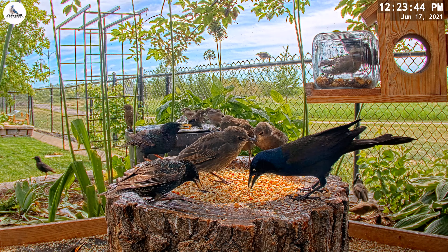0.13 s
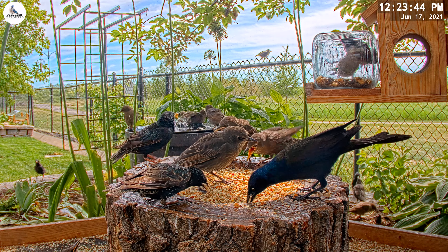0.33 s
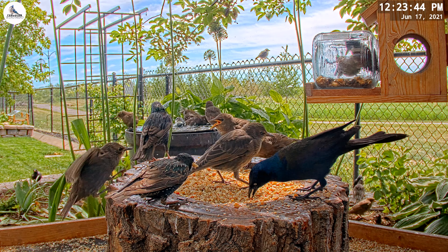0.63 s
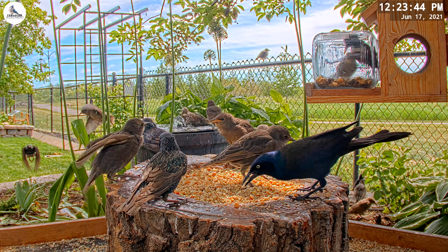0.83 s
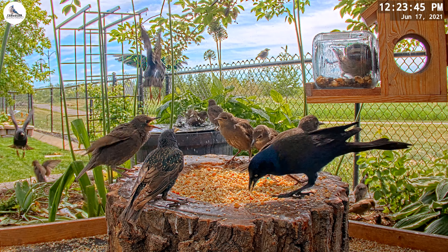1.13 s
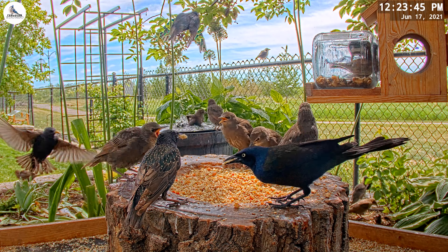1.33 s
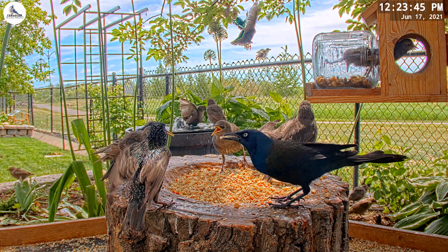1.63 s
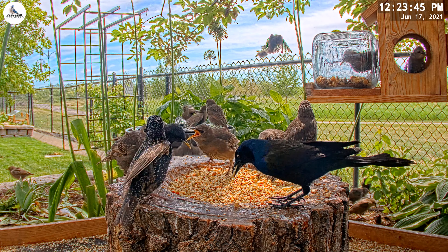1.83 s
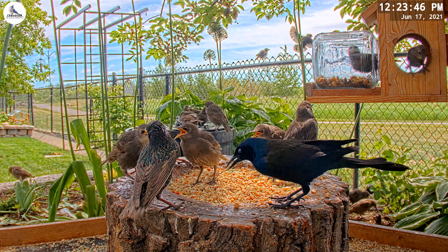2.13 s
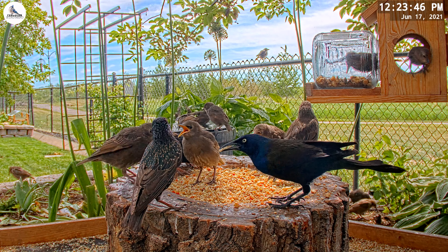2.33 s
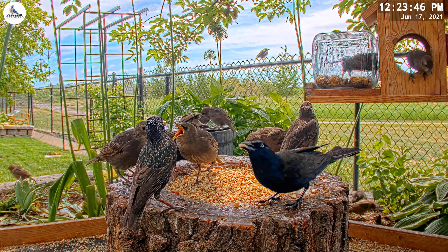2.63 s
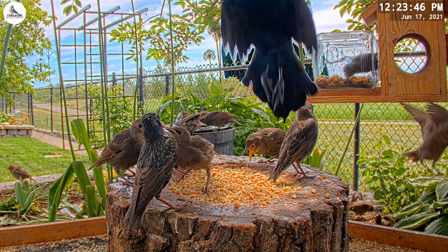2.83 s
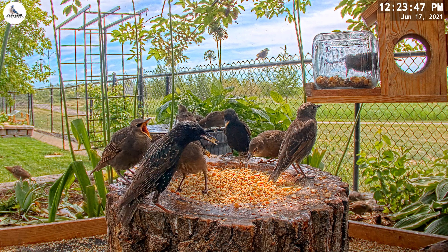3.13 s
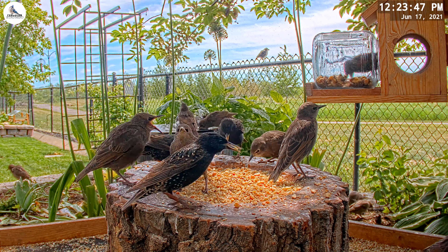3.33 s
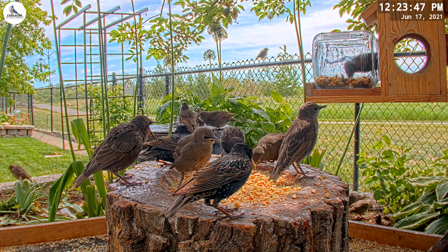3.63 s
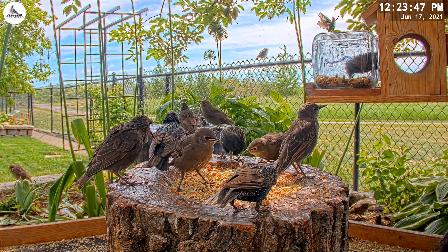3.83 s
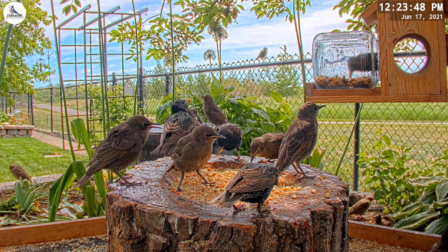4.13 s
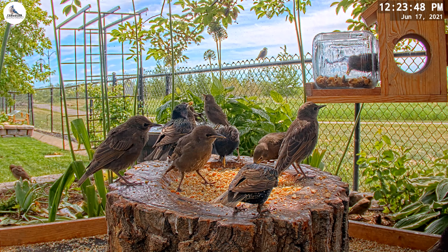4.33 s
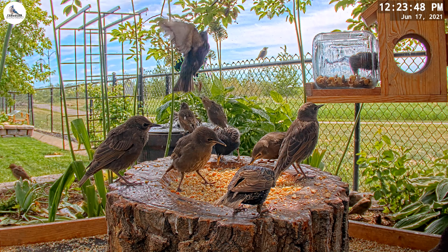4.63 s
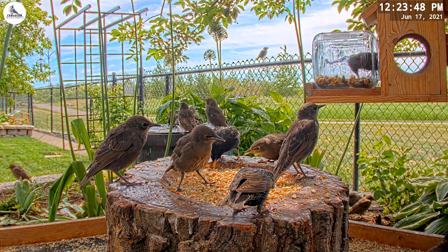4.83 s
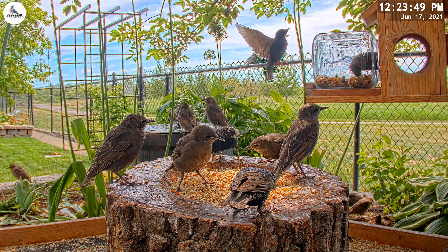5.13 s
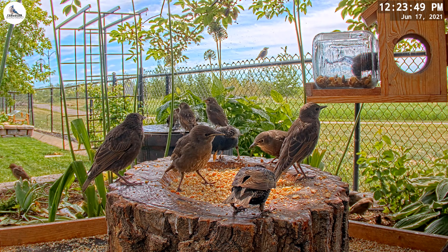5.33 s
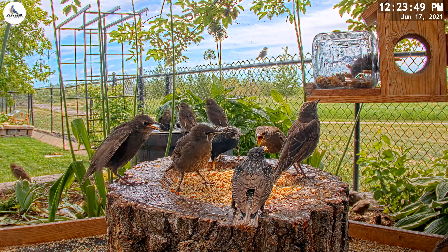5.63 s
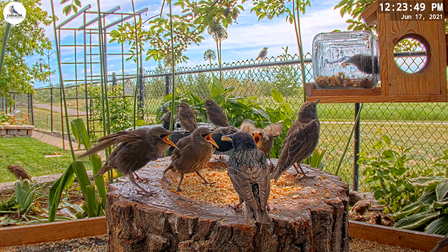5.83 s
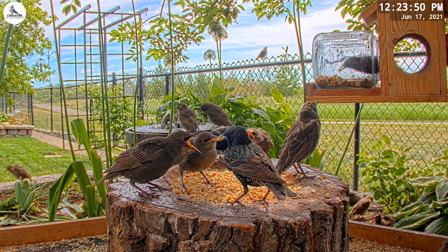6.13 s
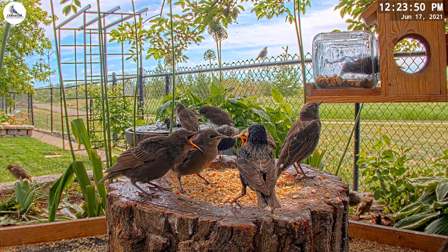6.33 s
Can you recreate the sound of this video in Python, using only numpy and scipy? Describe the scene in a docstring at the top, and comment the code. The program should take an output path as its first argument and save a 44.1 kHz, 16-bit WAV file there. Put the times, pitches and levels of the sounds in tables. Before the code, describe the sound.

Raspy, fast-trilled begging calls come from many young birds at a feeding stump, some near and piercing, others fainter behind. Beaks and claws tick on seed, water trickles in small bubbling drops, and wings beat air against the close microphone, strongest late. A low engine hum swells early and then recedes under quiet outdoor air. The sound is centred and dry, with only a slight short scatter from the garden.

```python
"""Young starlings beg in harsh trilled rasps around a garden feeding stump, close to one microphone.
Each rasp is a whistle swung some 45 times a second through a pair of crests and a deep dip, joined by a
second whistle and hiss and rung through throat and beak; one call is a squeal of sliding filtered noise.
Wings puff air at the microphone, beaks tick as short noise bursts on seed, and water drips as ringing
bubbles. Behind them hum a distant engine and a fainter drone, both wavering tones, in filtered-noise air."""
import sys
import numpy as np
from scipy import signal
from scipy.fft import rfft, irfft, next_fast_len
from scipy.io import wavfile
from scipy.ndimage import uniform_filter1d

SR = 44100
rng = np.random.default_rng(int(sys.argv[2]) if len(sys.argv) > 2 else 0)


def to_wav(sig):
    """Store sig (one row per channel, or 1-D mono) as 16-bit WAV at the path in sys.argv[1].

    Samples outside -1..1 are clipped; the rate is SR.
    """
    pcm = np.clip(np.atleast_2d(sig), -1, 1) * 32767
    pcm = np.round(pcm).astype(np.int16)
    wavfile.write(sys.argv[1], SR, pcm.T)  # frames by channels


N = 286209  # length [samples]

# Begging calls, one row a rasp:
# (start [s], time to peak [s], length [s], level of the main resonance at the peak [dB],
#  swell to the peak [dB], fade after it [dB],
#  throat, mouth and beak resonance at the peak [dB against the main one],
#  first crest [s], trill rate [1/s], crest pitch at full effort [Hz], roughness [0-1, acts up to 0.7],
#  accent on the first crest of each trill cycle [0-1],
#  throat [Hz], mouth [Hz], main [Hz], beak [Hz], sinking of the resonances over the call [share, < 0 rises])
RASPS = [(-0.015, 0.138, 0.36, -22, 9.3, 20, -6.5, -7, 1, 0.0093, 42.1, 5850, 0.66, 0.087, 3190, 4120, 5760, 6510, 0.11),
         (0.26, 0.071, 0.41, -20, 7.2, 36, -12, -15.0, -5.0, 0.017, 45.34, 5430, 0.49, 0.66, 3120, 4150, 6320, 8140, -0.098),
         (0.382, 0.037, 0.22, -38.0, 5.3, 19, 6.5, 6.5, 2, 0.0028, 45.75, 5380, 0.56, 0.19, 3040, 3960, 5460, 6500, 0.089),
         (0.556, 0.093, 0.33, -32.5, 10, 3.2, -4, -0.5, -4.5, 0.0046, 48.1, 6070, 0.75, 0.24, 3400, 4030, 6140, 7300, -0.07),
         (0.754, 0.11, 0.22, -23.0, 3.5, 20, -12, -9, -3, 0.0086, 49.3, 5300, 0.65, 0.33, 2270, 3960, 5230, 6670, 0.16),
         (0.937, 0.033, 0.22, -30.0, 7.5, 1.0, -10, -19, -0.5, 0.015, 45.9, 5100, 0.55, 0.32, 3150, 4160, 4950, 6320, 0),
         (1.1, 0.046, 0.26, -21.0, 8.7, 15.5, -15.5, -3.5, 3.5, 0.0086, 36.76, 5620, 0.47, 0.16, 3150, 4400, 5170, 7160, -0.18),
         (1.181, 0.12, 0.35, -22, 2, 20, -8, -2, -2.5, 0.013, 48.55, 5510, 0.6, 0.27, 3030, 4080, 6220, 7460, 0.02),
         (1.405, 0.047, 0.13, -19, 8.6, 10.6, -17.5, -10, -1, 0.011, 39.8, 6220, 0.54, 0.3, 2230, 4320, 5030, 6900, 0.013),
         (1.599, 0.161, 0.32, -26, 8, 17, -6, -8, 1.5, 0.012, 45.86, 5410, 0.62, 0.45, 2960, 4160, 4760, 6700, -0.16),
         (1.785, 0.096, 0.28, -38.5, 18, 13, 6, -2.5, 4.0, 0.0039, 44.7, 5160, 0.52, 0.28, 2990.0, 3920, 4950, 6600, -0.029),
         (2.305, 0.16, 0.33, -37.5, 9.8, 6.5, -2.5, 2, 1.0, 0.0042, 47.16, 6200, 0.67, 0.05, 3240, 4170, 4770, 6760, 0.17),
         (2.522, 0.14, 0.43, -25, 7.7, 13.7, -8, -7.5, -4, 0.017, 43.1, 5095, 0.65, 0.35, 3100, 3940.0, 5650, 7140, 0.046),
         (2.972, 0.071, 0.231, -39, 11, 22, -6.5, -3.5, -5, 0.019, 44.8, 5500.0, 0.75, 0.27, 2820, 3860, 5200, 8500, -0.088),
         (3.235, 0.086, 0.16, -36.5, 5.4, 9.1, -9.5, -3, 1, 0.018, 38.1, 5280.0, 0.8, 0.33, 3040, 4330, 5460.0, 7200, -0.083),
         (3.324, 0.068, 0.32, -14.5, 10.0, 21.3, -20.5, -16, -4, 0.015, 37.82, 5394, 0.33, 0.1, 3190, 3940, 5320, 6600, 0.05),
         (3.447, 0.063, 0.18, -34.0, 5.0, 9.8, -2.5, 8.5, 4, 0.025, 37.13, 5215, 0.426, 0.05, 3200.0, 3920, 4960, 6600, 0.0024),
         (3.577, 0.086, 0.34, -38, 3.0, 6.0, -2, -0.5, 2.5, 0.0026, 45.85, 5380, 0.49, 0.11, 3030, 3970, 5130, 6600, 0.16),
         (3.838, 0.049, 0.16, -7.5, 8.2, 16, -20.5, -12, -2.5, 0.013, 47.4, 6356, 0.28, 0.01, 2780, 3980, 5590, 7790, 0.08),
         (3.938, 0.112, 0.21, -13.5, 6.5, 14.4, -14, -20, -3.5, 0.021, 45.8, 5950.0, 0.54, 0.097, 3070, 4000, 5620, 7270, 0.09),
         (4.361, 0.065, 0.287, -33.5, 15, 9.2, -1.5, -1.5, -1, 0.009, 43.86, 5450, 0.74, 0.4, 2990, 4050, 5740, 8500, -0.01),
         (4.579, 0.16, 0.26, -35.5, 5.5, 7.1, -6.5, -6.5, 6, 0.0068, 47.86, 5115, 0.71, 0.22, 2870, 3970, 5090, 6100, 0.0013),
         (4.76, 0.11, 0.16, -47.5, 6.0, 12.0, 3.5, 1, 2, 0.015, 47.5, 5300.0, 0.84, 0.15, 3100, 3870.0, 5650, 8000, -0.059),
         (4.913, 0.035, 0.195, -11.5, 15.3, 30, -13, -6, -2.0, 0.0029, 47.9, 6210, 0.28, 0.097, 2750, 4000, 5500, 7500, 0.1),
         (5.167, 0.061, 0.15, -36.5, 5.9, 20, 2.5, -0.5, -1, 0.0093, 44.5, 5230, 0.47, 0.12, 2850, 3870.0, 5770, 7200, 0.07),
         (5.23, 0.093, 0.28, -30.5, 8.7, 3.9, -11.5, 3, -1, 0.014, 45.63, 4800, 0.53, 0.16, 2920, 4150, 4990.0, 7120.0, 0.26),
         (5.424, 0.096, 0.286, -23, 9.7, 15, -8.5, -7.0, 0.5, 0.0064, 48.96, 5590, 0.5, 0.75, 3130, 4200, 5560, 7400, 0.19),
         (5.686, 0.077, 0.19, -28.0, 6.9, 7.3, -6.0, -8, -1.0, 0.0099, 43.4, 5220, 0.96, 0.34, 3000.0, 4160, 5800, 7300, 0.036),
         (5.799, 0.104, 0.37, -18, 2.5, 15, -15, -12, -5, 0.014, 45.5, 5350, 0.5, 0.41, 2800, 4080, 5770, 7420, -0.023),
         (6.047, 0.063, 0.22, -33.5, 8.5, 12, -0.5, -0.5, 3, 0.0193, 43.2, 5710, 0.81, 0.17, 2780, 3520, 5880, 5850, -0.1),
         (6.197, 0.14, 0.33, -29.5, 5.3, 15.5, -2, 3.0, 1, 0.013, 47.57, 5410, 0.64, 0.15, 2950, 4100, 4740, 6340, 0.088)]
# Passing flights of beating wings:
# (first stroke [s], last stroke [s], stroke rate [1/s], time of nearest approach [s],
#  level there [dB], fall to either side [dB/s])
FLIGHTS = [(1.205, 1.43, 13, 1.324, -21.5, 47), (4.702, 5.006, 13.4, 4.935, -6, 83),
           (5.12, 5.56, 13.7, 5.36, -19, 36)]
# Beaks and claws on seed, before the gain in pecks(): (time [s], level [dB])
TICKS = [(0.5404, -29), (2.1206, -42.5), (2.167, -41), (2.1854, -38), (3.0427, -30), (3.1772, -37),
         (4.183, -39.5), (4.201, -35.5), (4.244, -35), (4.266, -29), (5.128, -38), (5.147, -35)]
# Water drops, before the gain in drip(): (time [s], level [dB], nominal bubble pitch [Hz])
DRIPS = [(0.246, -50, 683), (0.406, -42.5, 770), (0.622, -49, 855), (0.82, -48.5, 823), (0.901, -50.5, 515),
         (1.022, -42, 970), (1.521, -48, 720), (1.638, -47, 718), (1.923, -45, 694), (2.095, -53, 1137),
         (2.203, -47.5, 1060), (2.418, -41, 1100), (2.842, -53, 900), (3.28, -48, 670), (3.72, -47.5, 1330),
         (4.379, -45.5, 1100), (4.821, -47, 1234), (5.333, -47.5, 726), (5.629, -48.5, 985),
         (6.245, -50, 685), (6.451, -43.5, 1205)]
# Course of the distant engine: (time [s], level [dB])
ENGINE = [(0.0, -42.5), (1.41, -33.5), (2.6, -38.5), (3.7, -48.5), (6.49, -54.5)]
# Spectral shape of the garden air: (frequency [Hz], relative level per Hz [dB])
AIR = [(20, 8.5), (45, 9.5), (85, 2), (120, -1.5), (160, -7.5), (210, -15.5), (300, -18), (500, -17),
       (900, -15.5), (1500, -15.5), (3000, -21.5), (7000, -19.5), (11000, -25), (15500, -45)]
# Decay of the garden echoes: (frequency [Hz], time to fall 60 dB [s])
GARDEN = [(300, 0.18), (3000, 0.24), (7000, 0.12), (14000, 0.033)]

ATTACK_S, RELEASE_S = 0.019, 0.043
# dB per dB of effort: the throat follows least, so a rasp is brightest at its peak
THROAT_FOLLOW, MOUTH_FOLLOW, BEAK_FOLLOW = 0.49, 0.95, 1
THROAT_GROWTH_DB = 3.5  # the throat gains this over a call as the beak closes
TRILL_SLOWING_PER_S = 0.4  # share of its rate that a trill loses each second
USUAL_TRILL_PER_S = 48  # slower trills have two more evenly spaced crests
PITCH_PER_DB = 0.002  # share by which the whistle drops for each dB less effort
# extra top treble [dB] for each dB that a call is louder than usual
SIZZLE_GROWTH, USUAL_LEVEL_DB = 0.16, -23.5
BOUNCE_S, BOUNCE_SHARE = 0.0024, 0.33  # mean delay and gain of each call's return off the stump
AIR_DB = -48
EDGE_HZ = 15750  # upper band limit


def amp(db):
    """Level law: 20 dB is a tenfold amplitude."""
    return 10 ** (np.asarray(db) / 20)


def unit(x):
    """Normalization: scales a signal to rms 1."""
    return x / np.sqrt(np.mean(x ** 2) + 1e-20)


def read(points, hz):
    """Interpolation: reads a table along a logarithmic frequency axis."""
    f, value = np.transpose(points)
    return np.interp(np.log(hz + 1), np.log(f), value)


def add(mix, s, sound):
    """Superposition: adds a sound to the mix in place from time s."""
    part = mix[max(round(s * SR), 0):][:len(sound)]
    part += sound[:len(part)]


def colour(x, gain):
    """Linear filtering: multiplies the spectrum by a gain given as a function of frequency."""
    size = next_fast_len(len(x) + 512)
    spectrum = rfft(x, size) * gain(np.fft.rfftfreq(size, 1 / SR))
    return irfft(spectrum, size)[:len(x)]


def wander(size, hz):
    """Low-pass noise: smooth chance of rms 1, with little motion faster than hz."""
    return unit(colour(rng.standard_normal(size), lambda f: np.exp(-(f / hz) ** 2)))


def resonate(x, hz, width_hz, order=4):
    """Heterodyne resonance, free to move: shift hz down to zero, smooth, shift back."""
    turn = np.exp(2j * np.pi * np.cumsum(hz * np.ones(len(x))) / SR)
    r = np.exp(-np.pi * width_hz / SR)
    smooth = signal.lfilter([(1 - r) ** order], np.poly([r] * order), x / turn)
    return 2 * (turn * smooth).real


def whistle(hz, partials_db, jitter):
    """Harmonic series: one side of the syrinx sounds a few partials on an unsteady pitch."""
    phase = 2 * np.pi * np.cumsum(hz * (1 + jitter * wander(len(hz), 650))) / SR
    partials = (amp(db) * (k * hz < SR / 2) * np.sin(k * phase) for k, db in enumerate(partials_db, 1))
    return unit(sum(partials))


def syrinx(t, crest, rate, pitch_hz, rough, accent, swing=.26, lean=.13,
           other_db=-8, pulse_db=9, crest_db=24):
    """Frequency modulation: each trill cycle of the lead has two crests, then a deep dip, and slows."""
    rough = np.clip(rough, 0, .7)
    lag = TRILL_SLOWING_PER_S / 2 * (t - t[-1] / 3) ** 2
    turn = 2 * np.pi * ((t - crest - lag) * rate + 0.0075 * wander(len(t), 23))
    uneven = min(rate / USUAL_TRILL_PER_S, 1) ** 3
    # zero at the shallow dip midway between the two crests
    middle = turn - np.arccos(uneven / 4)
    bend = swing * (uneven * np.cos(middle) - np.cos(2 * middle)) / 2
    bend = bend - lean * accent * np.sin(middle)
    # pressure lifts pitch and loudness together, most of all on the first crest
    first_crest = ((1 + np.cos(turn)) / 2) ** 8
    pulse = amp(crest_db * bend + pulse_db * accent * first_crest)
    # the octave above the fundamental carries the call
    lead_hz = pitch_hz / 2 * (1 + bend - bend.max())
    lead = whistle(lead_hz, [-7, 0, -14, -13, -20], jitter=.07 * rough)
    # the other side warbles twice in each cycle, with a wander of its own
    warble = 1 + .1 * np.sin(2 * turn + 2 * wander(len(t), 61.4))
    other = whistle(2 / 3 * pitch_hz * warble, [-4, 0, -12], jitter=0.0287)
    # turbulent air
    hiss = rng.standard_normal(len(t)) * amp(3 * wander(len(t), 400)) * (.1 + rough)
    return (1 - rough) * unit(lead * pulse) + amp(other_db) * (rough + 0.074) * other + hiss


def rasp(start, peak_s, length, level_db, swell_db, fade_db, throat_db, mouth_db, beak_db,
         crest, rate, pitch_hz, rough, accent, throat_hz, mouth_hz, main_hz, beak_hz, sag,
         chest_db=-11.0, hollow_db=-21, tip_db=-9.5, sizzle_db=-20, echo=0.17):
    """Source and filter: effort swells and fades while the syrinx rings throat and beak."""
    t = np.arange(max(-start, 0), length, 1 / SR)
    gate = np.clip(t / ATTACK_S, 0, 1) * np.clip((length - t) / RELEASE_S, 0, 1)
    effort_db = np.interp(t, [0, peak_s, length], [-swell_db, 0, -fade_db])
    closing = t / length - .5
    throat = throat_db + THROAT_FOLLOW * effort_db + THROAT_GROWTH_DB * closing
    mouth = mouth_db + MOUTH_FOLLOW * effort_db
    beak = beak_db + BEAK_FOLLOW * effort_db
    source = syrinx(t, crest, rate, pitch_hz * (1 + PITCH_PER_DB * effort_db), rough, accent)
    # an echo along the windpipe ripples the spectrum
    source = source + echo * np.interp(t - 4 / mouth_hz, t, source)
    sizzle = beak + sizzle_db + SIZZLE_GROWTH * (level_db - USUAL_LEVEL_DB)
    # (mid-call frequency [Hz], width [Hz], level [dB])
    rings = [(1200, 900, throat + hollow_db), (0.6455 * throat_hz, 800, throat + chest_db),
             (throat_hz, 1050, throat), (mouth_hz, 720, mouth), (main_hz, 1650, effort_db),
             (beak_hz, 3200, beak), (9200, 2600, beak + tip_db), (11800, 6000, sizzle)]
    out = np.zeros(len(t))
    for hz, width, db in rings:
        ring = resonate(source, hz * (1 - sag * closing), width)
        # evened over 43 ms, so that effort sets the strength and the trill stays
        strength = np.sqrt(abs(uniform_filter1d(ring ** 2, size=1900)) + 1e-12)
        out += amp(db) * ring / strength
    return amp(level_db) * gate * out


def flock():
    """Superposition and reflection: calls overlap, each with its own delay off the stump."""
    out = np.zeros(N)
    for row, place in zip(RASPS, rng.uniform(.6, 1.4, len(RASPS))):
        call = rasp(*row)
        add(out, row[0], call)
        add(out, max(row[0], 0) + BOUNCE_S * place, BOUNCE_SHARE * call)
    return out


def squeal(start=5.485, length=.095, from_hz=8300, to_hz=5800, width_hz=1100, level_db=-24):
    """Gliding resonance on noise: one bird's short hoarse squeal slides steeply down."""
    out, u = np.zeros(N), np.arange(0, length, 1 / SR) / length
    glide_hz = from_hz + (to_hz - from_hz) * u
    slide = unit(resonate(rng.standard_normal(len(u)), glide_hz, width_hz))
    add(out, start, amp(level_db) * np.sin(np.pi * u) * slide)
    return out


def wings(width=0.0059, rebound=0.52, flutter_db=-21, swish_db=-39, swish_hz=900):
    """Pressure pulses: each steady stroke sucks air off the microphone, then pushes it back."""
    out, t = np.zeros(N), np.arange(-.04, .08, 1 / SR)
    puff = rebound * np.exp(-((t - .024) / 0.012) ** 2) - np.exp(-(t / width) ** 2)
    for first, last, rate, nearest, db, fall in FLIGHTS:
        for s in np.arange(first, last + .5 / rate, 1 / rate):
            # low flutter of air and a swish of feathers
            flutter = unit(colour(rng.standard_normal(len(t)), lambda f: 1 / (1 + (f / 120) ** 3)))
            swish = unit(resonate(rng.standard_normal(len(t)), swish_hz, 1670))
            swish = swish * np.exp(-(t / 0.02) ** 2)
            stroke = puff + amp(flutter_db) * flutter * np.exp(-(t / 0.031) ** 2)
            near = amp(db - fall * abs(s - nearest))
            # the swish carries farther than the puff of air
            add(out, s + t[0], near * stroke + np.sqrt(near) * amp(swish_db) * swish)
    return out


def pecks(ring_hz=7200, decay=0.007, gain_db=-4, rustle_db=-47, rustle_hz=5200, count=110):
    """Damped impacts: dry ticks of beaks and claws on seed, over a faint rustle of shifting grains."""
    out, t = np.zeros(N), np.arange(900) / SR
    for s, db in TICKS:
        crack = unit(resonate(rng.standard_normal(len(t)), ring_hz, 9900))
        add(out, s, amp(db + gain_db) * crack * np.exp(-t / decay))
    for when, size, pitch in rng.random((count, 3)):
        grain = unit(resonate(rng.standard_normal(len(t)), rustle_hz * (.5 + pitch), 7000))
        add(out, when * N / SR, amp(rustle_db + 12 * (size - .5)) * grain * np.exp(-t / .004))
    return out


def drip(db, hz, rise=7, t60=0.07, splash_db=-11):
    """Bubble resonance: a trapped bubble rings and climbs in pitch, with a small splash at its onset."""
    t = np.arange(4000) / SR
    bubble_hz = hz * (.95 + rise * rng.uniform(0.22, 1.6) * t)
    bubble = np.sin(2 * np.pi * np.cumsum(bubble_hz) / SR)
    bubble = bubble * (1 - np.exp(-t / 0.00046)) * amp(-60 * t / t60)
    splash = unit(resonate(rng.standard_normal(len(t)), 1270, 1270)) * np.exp(-t / 0.011)
    return amp(db + 12) * (bubble + amp(splash_db) * splash)


def water(small_db=-60, count=190):
    """Random arrivals: plain drops over a trickle of small ones at chance times."""
    out = np.zeros(N)
    for s, db, hz in DRIPS:
        add(out, s, drip(db, hz))
    for when, size, pitch in rng.random((count, 3)):
        add(out, when * N / SR, drip(small_db + 10 * (size - .5), 600 * 2.4 ** pitch))
    return out


def hum(hz):
    """Slow frequency modulation: a sine of about rms 1 wavers around hz."""
    return np.sqrt(2) * np.sin(2 * np.pi * np.cumsum(hz * (1 + 0.0092 * wander(N, 2.03))) / SR)


def background(engine_hz=66.2, drone_hz=143.3, drone_db=-57.0):
    """Tones in shaped noise: a wavering engine note and a fainter drone in the garden air."""
    t = np.arange(N) / SR
    engine = amp(np.interp(t, *np.transpose(ENGINE))) * hum(engine_hz)
    drone = amp(drone_db + 2 * wander(N, 17)) * hum(drone_hz)
    air = unit(colour(rng.standard_normal(N), lambda f: amp(read(AIR, f))))
    return engine + drone + amp(AIR_DB + wander(N, 2.9)) * air


def garden(x, wet_db=-19):
    """Diffuse reflection: a thin, short scatter from fence, leaves and feeder."""
    hz, t, z = signal.stft(rng.standard_normal(SR // 2), SR, nperseg=256)
    decay = amp(-60 * t / read(GARDEN, hz)[:, None])
    tail = signal.istft(z * decay, SR, nperseg=256)[1]
    return x + amp(wet_db) * signal.fftconvolve(x, tail / np.linalg.norm(tail))[:N]


def scene():
    """Superposition: all sources meet at one microphone, alike in both channels."""
    echoing = garden(flock() + squeal() + pecks() + water())
    mono = echoing + wings() + background()
    return np.array([mono, mono])


def record(dry):
    """Saturation and band limit: the loudest crests clip at full scale, then a low-pass follows."""
    low_pass = signal.firwin(511, EDGE_HZ, window=("kaiser", 9), fs=SR)
    return signal.oaconvolve(np.clip(dry, -1, 1), low_pass[None], "same")


dry = scene()
out = record(dry)
to_wav(out)
```